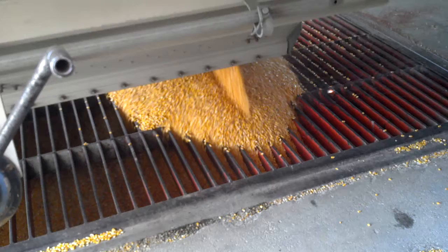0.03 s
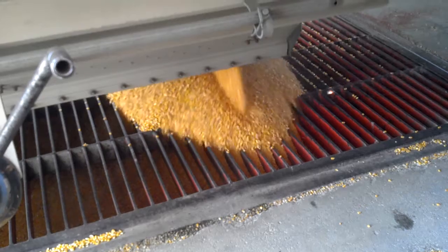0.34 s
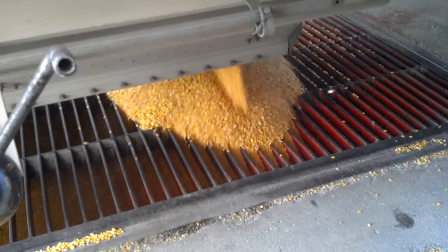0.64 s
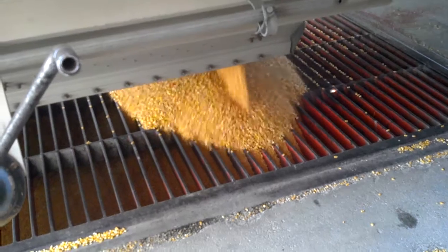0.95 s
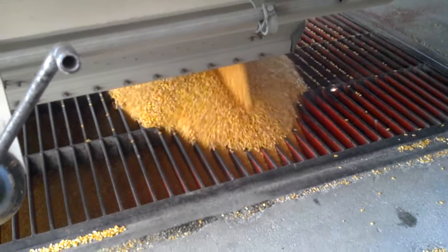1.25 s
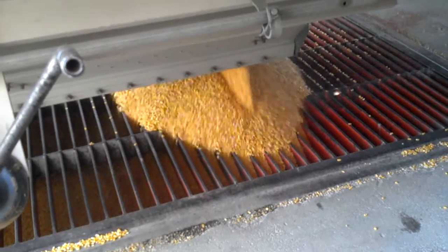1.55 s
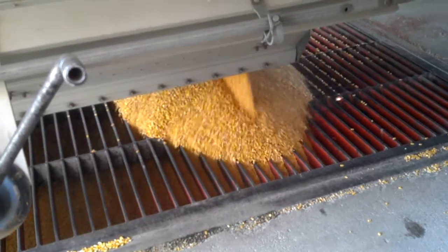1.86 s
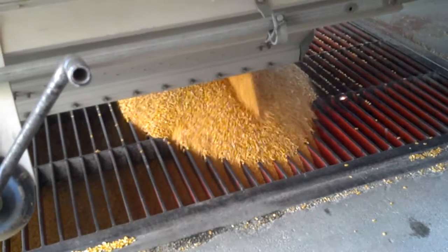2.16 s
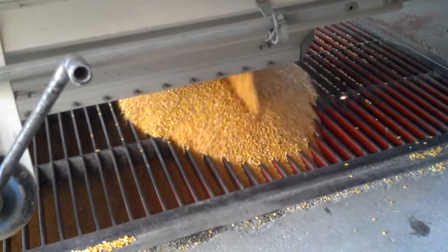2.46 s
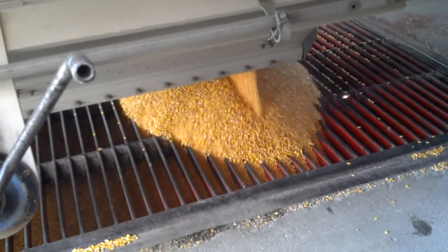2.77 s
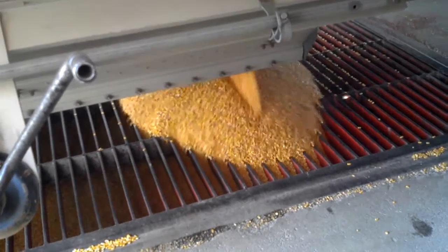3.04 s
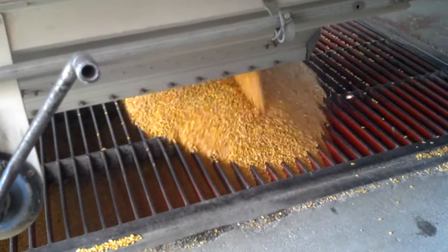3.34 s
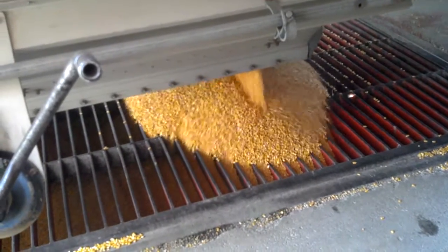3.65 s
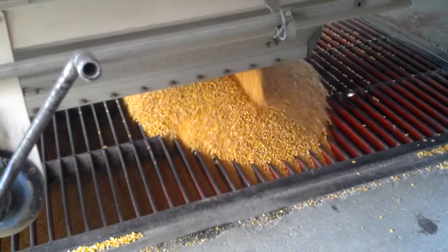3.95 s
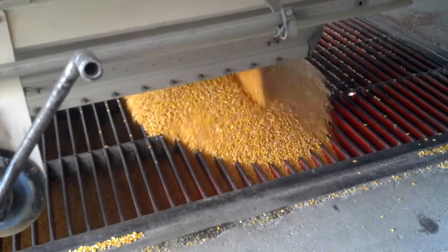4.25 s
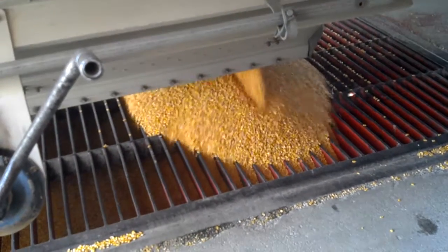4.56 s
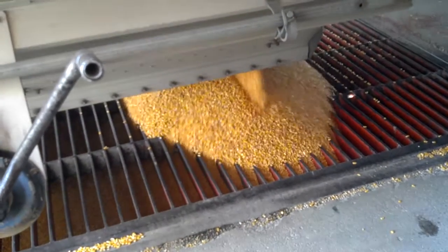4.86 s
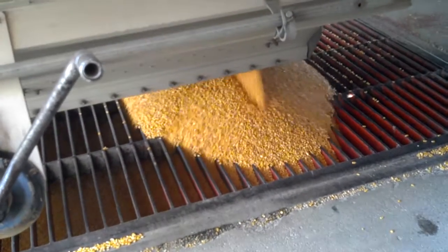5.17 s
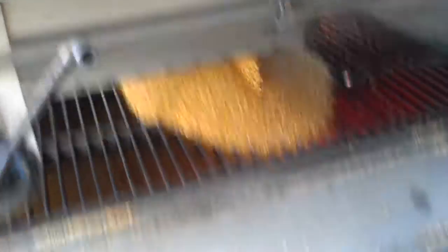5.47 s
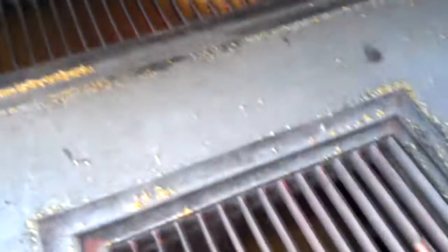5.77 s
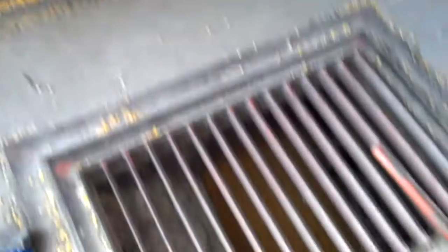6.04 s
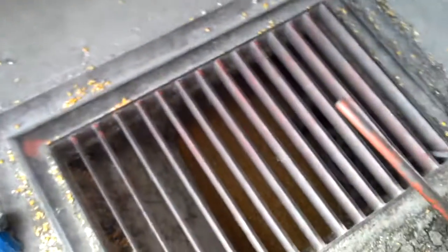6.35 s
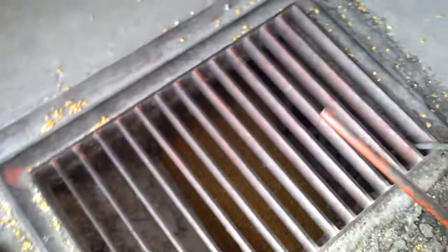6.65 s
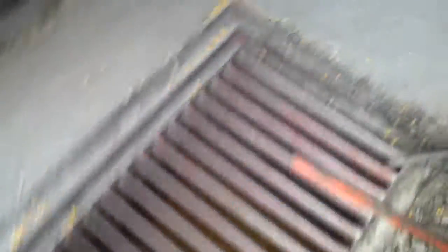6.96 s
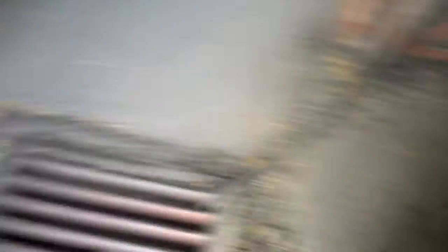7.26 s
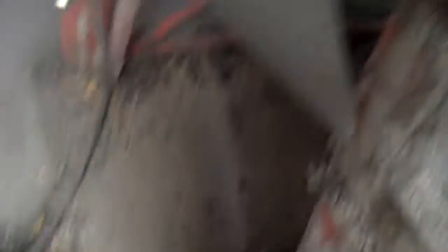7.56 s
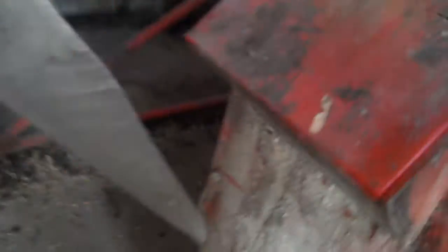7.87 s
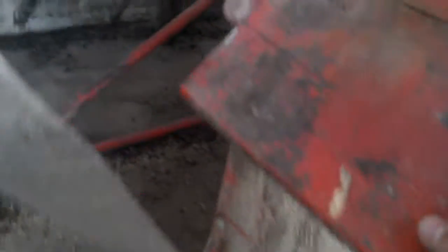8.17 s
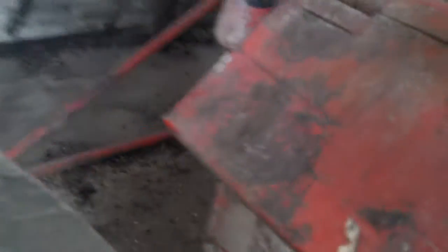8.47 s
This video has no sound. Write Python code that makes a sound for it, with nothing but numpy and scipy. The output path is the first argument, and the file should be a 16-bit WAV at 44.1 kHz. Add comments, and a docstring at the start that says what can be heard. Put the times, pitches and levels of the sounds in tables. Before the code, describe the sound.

Maize pours through a steel grate with a steady hiss over droning machinery, while sheet metal booms and wind bumps the microphone.

```python
"""Maize pouring through a grate

Maize slides from a trailer hopper through a steel floor grate: countless impacts merge into a hiss
over the roar of the pit, a conveyor's drone and an engine's hum. As the load slumps, the hopper's
sheet metal booms and clanks. Eddies of wind bump one of the camera's two microphone ports. Its gain
control ducks after loud bumps, and it widens the stereo by feeding each port to the other side."""
import sys
import numpy as np
from scipy import signal
from scipy.fft import rfft, irfft
from scipy.io import wavfile
from scipy.ndimage import uniform_filter1d

SR = 44100
rng = np.random.default_rng(int(sys.argv[2]) if len(sys.argv) > 2 else 0)


def output_pcm(signal):
    """Save a mono or channel-first signal as 16-bit PCM at the path in sys.argv[1].

    Samples are clipped to [-1, 1] before scaling.
    """
    pcm = np.clip(np.atleast_2d(signal).T, -1, 1) * 32767
    wavfile.write(sys.argv[1], SR, np.round(pcm).astype(np.int16))


N = 379701
TIME, HZ = np.arange(N) / SR, np.fft.rfftfreq(N, 1 / SR)
PORT_TRANSIT_S = .12 / 343  # port spacing over the speed of sound
START_S = .71  # silence until here

# slumps of the load: (time [s], boom level [dB], rattle level [dB], rise [s], t60 [s],
# ring level [dB], frequency round which the struck spot rings [Hz])
SLUMPS = [(1.509, -26, -49, 0.0074, .15, -31, 400), (2.615, -32, -33, .003, .3, -25, 446),
          (2.639, -21.5, -30, 0.0024, 0.72, -17.5, 700), (2.694, -21.5, -36, .004, 0.48, -20.5, 300),
          (2.868, -30, -38, .003, 0.1, -35, 270), (5.9, -26, -30.5, 0.0091, 1, -24, 170),
          (5.944, -14.5, -26.5, 0.0045, 0.6, -15.5, 266), (5.98, -30, -40, 0.0054, .4, -14, 455),
          (6.058, -19.5, -32, .008, 0.49, -16.5, 610), (6.1, -21, -33, .004, 0.27, -20.5, 740),
          (6.25, -28, -42, 0.0088, .5, -26.5, 380), (7.061, -31, -42, 0.013, 0.58, -27, 454),
          (7.184, -15, -24.5, 0.0085, 0.44, -13, 443), (7.229, -18.5, -30, .006, 0.96, -20.5, 494),
          (7.324, -21.5, -37, 0.0048, .66, -18, 307), (7.46, -26, -50, 0.0073, 0.93, -27, 360),
          (8.504, -27, -34.5, 0.0043, 0.17, -34.5, 800), (8.522, -23.5, -42, .005, 0.27, -26, 380)]
# gusts of wind: (start [s], length [s], typical eddy strength [dB])
GUST_SPANS = [(1.22, 0.68, -17), (1.85, 0.36, -14.5), (2.34, 0.19, -15), (2.74, 0.15, -14.5),
              (3.48, .29, -17), (5.15, 0.39, -23.5), (5.549, .15, -28), (7.86, 0.15, -22),
              (8.33, 0.19, -20.5)]


def amp(db):
    """Amplitude ratio of a level in decibels."""
    return 10 ** (np.asarray(db) / 20)


def unit_rms(x):
    """Normalisation to unit mean power."""
    return x / np.sqrt(np.mean(x ** 2) + 1e-20)


def colour(points):
    """Frequency response through (frequency [Hz], level [dB]) points, on a logarithmic axis."""
    hz, db = np.transpose(points)
    return amp(np.interp(np.log(HZ + 1), np.log(hz), db))


def resonances(modes):
    """Superposition of Lorentzian resonance peaks."""
    return sum(amp(db) / (1 + (2 * (HZ - hz) / width) ** 2) for hz, width, db in modes)


def modal_boost(modes):
    """A flat response that resonance alters by so many decibels at each mode."""
    return amp(sum(db / (1 + (2 * (HZ - hz) / width) ** 2) for hz, width, db in modes))


def envelopes(rows):
    """One amplitude envelope for each column of levels over time."""
    times, *columns = np.transpose(rows)
    return [amp(np.interp(TIME, times, db)) for db in columns]


def filtered(x, response):
    """Linear filtering, normalised to unit power."""
    return unit_rms(irfft(rfft(x) * response, N))


def wander(per_s):
    """Slow random modulation of unit power."""
    knots = rng.standard_normal(4000)
    return unit_rms(np.interp(TIME * per_s, np.arange(len(knots)), knots))


def diffuse(response):
    """Diffuse field: noise from all sides is coherent at the two ports only for long waves."""
    left, independent = rfft(rng.standard_normal((2, N)))
    coherence = np.sinc(2 * HZ * PORT_TRANSIT_S)
    right = coherence * left + np.sqrt(1 - coherence ** 2) * independent
    return unit_rms(irfft(np.array([left, right]) * response, N))


def grain(slide_db=0.62, spatter_db=0.5, clump_db=0.84, sway_db=0.5):
    """Friction and impact: kernels rub down the heap and spatter on the bars, in small clumps."""
    # the stream, duller as the camera turns away: (time [s], sliding level [dB], spatter level [dB])
    flow = [(.9, -37, -36), (2.4, -34.5, -35), (4.3, -34.5, -36.5), (5.7, -34, -35.5), (6.7, -33.5, -36),
            (7.6, -35, -39.5), (8.6, -36, -39)]
    # spectrum of sliding: (frequency [Hz], level [dB])
    slide_spectrum = [(90, -1), (200, 6), (700, 4.5), (1200, 1.5), (1750, 0), (2200, -6.5), (3800, -2),
                      (5000, 0), (7000, -7), (10000, -6.5), (15500, -17.5)]
    # spectrum of spatter: (frequency [Hz], level [dB])
    spatter_spectrum = [(3000, -29), (5000, -10.5), (6000, 1), (6900, 2.5), (8000, 1.5), (9200, -4.5),
                        (10500, -11), (12000, -13), (13200, -18), (14500, -30), (15600, -12)]
    # acoustic shadow at the right port, which faces away: (frequency [Hz], gain [dB])
    shadow = [(2000, -7), (3400, 1), (4700, -3.5), (6200, -3.5), (7600, -12), (9000, -3.5), (10300, -3),
              (11700, -12), (13000, -3.5), (15000, -10)]
    # modes of the grate: (frequency [Hz], bandwidth [Hz], gain [dB])
    bar_modes = [(1780, 170, 2.5), (2228, 330, 9), (2420, 26, 10.5), (3380, 50, 5.5), (3940, 27, 4.5)]
    slide_gain, spatter_gain = np.array(envelopes(flow)) * surges() * amp(sway_db * wander(per_s=15))
    ports = np.array([np.ones(len(HZ)), colour(shadow)])
    slide_response = ports * colour(slide_spectrum) * modal_boost(bar_modes)
    sliding = filtered(kernels(per_s=3500, wash_db=-1.0), slide_response)
    spattering = filtered(kernels(per_s=6000, wash_db=5.5), ports * colour(spatter_spectrum))
    stream = amp(slide_db) * slide_gain * sliding + amp(spatter_db) * spatter_gain * spattering
    return stream * amp(clump_db * wander(per_s=60))


def kernels(per_s, wash_db, spread_db=2.5):
    """Shot noise: single impacts of unequal size over the Gaussian wash of countless faint ones."""
    size = amp(spread_db * np.minimum(rng.exponential(1, (2, N)), 4))
    ticks = size * rng.choice([-1, 1], (2, N)) * (rng.random((2, N)) < per_s / SR)
    return unit_rms(ticks) + amp(wash_db) * rng.standard_normal((2, N))


def surges(attack_s=0.0044, release_s=0.032):
    """Amplitude modulation of sliding and spatter: each loose clump swells, holds and trickles out."""
    # clumps breaking loose: (time [s], hold [s], sliding boost [dB], spatter boost [dB])
    clumps = [(0.913, 0.3, 4.5, 2), (1.355, 0.043, 5.5, 5.5), (3.363, 0.059, 5, 6), (3.955, 0.04, 3, 3.5),
              (4.174, 0.21, 1.5, 2.5), (4.758, .02, 0.5, 3.5), (5.031, .02, 2, 3.5), (5.8, 0.1, 0, 1.5),
              (6.306, 0.082, 2.5, 3.5), (6.706, 0.054, 1.5, 5.5), (6.948, 0.032, 2.5, 3),
              (7.06, 0.21, 4, 3.5), (7.33, 0.026, 2, 6), (7.59, 0.064, 3, 8), (7.748, .06, 0.5, 4),
              (7.888, 0.037, 2.5, 11), (8.058, 0.017, 1, 6), (8.26, 0.068, 3, 5), (8.4, 0.028, 1.5, 4.5),
              (8.57, .04, 1.5, 3.5)]
    boost_db = np.zeros((2, N))
    for start, hold, *peaks_db in clumps:
        age = TIME - start
        swell = np.clip(age / attack_s, 0, 1) * np.exp(-np.maximum(age - hold, 0) / release_s)
        boost_db += np.outer(peaks_db, swell)
    return amp(boost_db)


def sprays():
    """Resonant filtering: skittering kernels hiss round the pitch of the steel they hit, on the left."""
    # handfuls of kernels: (time [s], level [dB], 1/e half-length [s], centre [Hz], bandwidth [Hz])
    handfuls = [(4.36, -38, 0.047, 4860, 516), (5.83, -42, 0.11, 4170, 550),
                (6.772, -30.5, 0.024, 9100, 900), (7.557, -31.5, 0.025, 6820, 698)]
    left = np.zeros(N)
    for time, db, half_length, hz, width in handfuls:
        swell = amp(db) * np.exp(-((TIME - time) / half_length) ** 2)
        left += swell * filtered(rng.standard_normal(N), resonances([(hz, width, 0)]))
    return np.array([left, np.zeros(N)])


def hopper_booms(rattle_t60_share=0.95):
    """Damped vibration: each slump excites a low boom and a brighter rattle; overlaps add in power."""
    # spectrum of the boom: (frequency [Hz], level [dB])
    boom_spectrum = [(40, -44), (130, -5.5), (240, -1), (430, -2), (650, -9.5), (900, -23), (1150, -24),
                     (2500, -35), (6000, -58)]
    # spectrum of the rattle: (frequency [Hz], level [dB])
    rattle_spectrum = [(300, -29), (580, -2), (800, 12), (1300, -4.5), (1750, -1), (2300, 0.5), (3500, -21),
                       (6000, -28)]
    boom_power, rattle_power = np.zeros((2, N))
    for start, boom_db, rattle_db, rise, t60, _, _ in SLUMPS:
        age = np.maximum(TIME - start, 0)
        onset = np.minimum(age / rise, 1)
        decay_db = 60 * np.maximum(age - rise, 0) / t60
        boom_power += (onset * amp(boom_db - decay_db)) ** 2
        rattle_power += (onset * amp(rattle_db - decay_db / rattle_t60_share)) ** 2
    boom = np.sqrt(boom_power) * diffuse(colour(boom_spectrum))
    rattle = np.sqrt(rattle_power) * diffuse(colour(rattle_spectrum))
    return boom + rattle


def panels(focus_db_per_octave=8, detune=0.0075, chatter=0.46, chatter_hz=40, ring_s=2):
    """Modal ringing: a slump excites modes near its pitch most; the load detunes and roughens them."""
    # modes of the hopper's steel panels: (frequency [Hz], level [dB], t60 [s])
    panel_modes = [(168, -11, 1.1), (267, -4, 0.62), (311, -8, 1.6), (380, -15, 1.75), (428.2, -12, 0.38),
                   (452, -4, 0.5), (475, -16, 0.49), (499, -8, 0.39), (553, -16.5, .5), (585, -20, 0.65),
                   (619, -15.5, 1.1), (663, -9, 0.32), (736, -21, 0.49), (773, -13, 0.45),
                   (836, -18.5, 0.53), (968, -14.5, .5), (1253, -15, 0.32), (1490, -18, 0.69),
                   (1673, -15.5, .4), (1868, -28, .3)]
    hz, db, t60 = np.transpose(panel_modes)
    age = np.arange(ring_s * SR) / SR
    knots = rng.standard_normal((len(hz), 200, 2)) @ [1, 1j]
    roughness = np.array([np.interp(age * chatter_hz, np.arange(len(row)), row) for row in knots])
    modes = (1 + chatter * roughness) * np.exp(np.outer(2j * np.pi * hz - np.log(1000) / t60, age))
    # each mode reaches the ports from its own direction
    lag_s = np.outer([0, 1], rng.uniform(-1, 1, len(hz))) * PORT_TRANSIT_S
    out = np.zeros((2, N))
    for start, _, _, rise, _, ring_db, ring_hz in SLUMPS:
        excitation = amp(ring_db + db - focus_db_per_octave * abs(np.log2(hz / ring_hz)))
        phasors = np.exp(2j * np.pi * (rng.random(len(hz)) + hz * lag_s))
        ring = ((excitation * phasors) @ modes).real * np.minimum(age / rise, 1)
        pitch_ratio = 1 + detune * rng.uniform(-1.02, 1)
        out += [np.interp((TIME - start) * pitch_ratio, age, port, 0, 0) for port in ring]
    return out


def knocks(relative_bandwidth=0.74):
    """Impact of steel on steel: a broad, heavily damped resonance gives an abrupt clank."""
    # hard knocks: (time [s], level [dB], t60 [s], centre frequency [Hz])
    impacts = [(1.657, -20, 0.068, 520), (2.641, -23, .05, 680), (2.661, -35, .05, 1500),
               (5.931, -23, .05, 1600), (5.95, -19, 0.09, 750), (7.192, -34, 0.035, 600),
               (7.202, -22, 0.079, 1510)]
    out = np.zeros((2, N))
    for start, db, t60, hz in impacts:
        age = TIME - start
        decay = (age > 0) * amp(db - 60 * np.maximum(age, 0) / t60)
        out += decay * diffuse(resonances([(hz, relative_bandwidth * hz, 0)]))
    return out


def wind(push_db=-4, wake_db=-14, wake_s=0.016, breeze_db=-54, breeze_swing_db=3.5, order=9):
    """Turbulent pressure: each eddy pushes and sucks at the right port, over a faint breeze."""
    # the hardest eddies: (time [s], strength [dB], centre frequency [Hz])
    puffs = [(1.416, -8, 245), (1.515, -3, 235), (1.526, -3, 380), (1.546, -7, 175), (1.577, -7, 150),
             (1.65, -4, 280), (1.661, 5.5, 273), (1.687, -2, 255), (1.712, -2.5, 185), (1.929, -1.5, 195),
             (1.953, -3, 231), (2.34, -4, 220), (2.739, -19, 164.1), (2.759, 6, 185), (3.509, -6, 210),
             (3.527, -6, 190), (5.141, -5.5, 139), (5.187, -9, 173), (5.221, -13, 210), (5.319, -11, 181),
             (5.463, -21, 157), (7.816, -9, 177)]
    # spectrum of turbulence at the port: (frequency [Hz], level [dB])
    turbulence_spectrum = [(40, -20), (70, -0.5), (125, 7), (200, -1.5), (350, -20), (700, -19.5),
                           (2000, -67)]
    turbulence = filtered(rng.standard_normal(N), colour(turbulence_spectrum))
    breeze = amp(breeze_db + breeze_swing_db * wander(per_s=22))
    pushes, wake_power = np.zeros((2, N))
    for time, db, hz in puffs + eddies():
        near = abs(TIME - time) < .1
        age = TIME[near] - time
        # a wavelet of random phase; a higher order gives it more cycles
        swirl = np.exp(2j * np.pi * rng.random()) / (1 - 2j * np.pi * hz * age / (order - .5)) ** order
        pushes[near] += amp(db) * swirl.real
        wake_power[near] += (amp(db) * np.exp(-abs(age) / wake_s)) ** 2
    turbulence_gain = amp(wake_db) * np.sqrt(wake_power) + breeze + buffeting()
    return np.array([np.zeros(N), amp(push_db) * pushes + turbulence_gain * turbulence])


def eddies(per_s=24, spread_db=1, centre_hz=140, octaves_per_db=0.6, max_per_gust=40):
    """Eddy shedding, uneven, the harder the brighter: (time [s], strength [dB], frequency [Hz])."""
    rows = []
    for start, length, db in GUST_SPANS:
        for k, (late, size) in enumerate(rng.random((max_per_gust, 2))):
            age = (k + late) / per_s
            extra_db = spread_db * (2 * size - 1)
            if age < length:
                rows.append((start + age, db + extra_db, centre_hz * 2 ** (octaves_per_db * extra_db)))
    return rows


def buffeting(level_db=-17, swing_db=4.0, edge_s=0.037):
    """Intermittency: the ragged envelope of the turbulence that fills each gust."""
    swell = np.zeros(N)
    for start, length, db in GUST_SPANS:
        outside_s = np.maximum(abs(TIME - start - length / 2) - length / 2, 0)
        swell += amp(db) * np.exp(-outside_s / edge_s)
    return swell * amp(level_db + swing_db * wander(per_s=35))


def pit(level_db=-31.0):
    """Standing waves in the concrete pit colour a diffuse roar."""
    # spectrum of the roar: (frequency [Hz], level [dB])
    roar_spectrum = [(40, -50), (75, -25), (135, -2.5), (220, -1.5), (340, -2), (450, -3.5), (620, -6),
                     (760, -9), (900, -11), (1100, -16.5), (1400, -23.5), (2200, -45), (5000, -59)]
    # modes of the pit: (frequency [Hz], bandwidth [Hz], gain [dB])
    pit_modes = [(124, 27, 3.5), (378, 27, 4.5), (436, 22, 1.5), (497, 11, 0.5), (596.5, 17, 6.5),
                 (642, 13, 4), (706, 14, -1.5), (713, 13, 4), (800, 13, 5.5), (868, 18, 2), (908, 11, 6.5),
                 (992, 12, 5)]
    return amp(level_db) * diffuse(colour(roar_spectrum) * modal_boost(pit_modes))


def conveyor():
    """Resonance: the conveyor drones in three narrow bands of noise and a faint broad one."""
    # peaks of the drone: (frequency [Hz], bandwidth [Hz], level [dB])
    drone_peaks = [(315, 12, 1.5), (376, 14, -6), (617.6, 6.3, -1.5), (1500, 840, -26)]
    # the drone grows as the camera turns to it: (time [s], level [dB])
    drone_levels = [(.9, -44), (4.2, -47), (6, -46.5), (7.6, -39), (8.6, -38)]
    return envelopes(drone_levels)[0] * diffuse(resonances(drone_peaks))


def engine(firing_hz=72.6, hum_db=-44, waver=0.0041, throb_db=7.0):
    """Periodic firing makes a throbbing harmonic series that drives the two ports in antiphase."""
    # harmonics: (multiple of the firing rate, level [dB])
    harmonics = [(1, 1), (2, -10), (3, -30)]
    cycles = np.cumsum(firing_hz * (1 + waver * wander(per_s=8))) / SR
    firing = sum(amp(db) * np.sin(2 * np.pi * k * cycles) for k, db in harmonics)
    hum = unit_rms(firing) * amp(hum_db + throb_db * wander(per_s=8))
    return np.array([hum, -hum]) / 2


def gain_control(x, threshold_db=-15.5, range_db=7.5, recover_db_per_s=3, start_duck_db=5):
    """Compression: the gain starts low, drops at once on loud bumps or booms, and creeps back up."""
    bass_cut = signal.butter(2, 140, "high", fs=SR, output="sos")  # deep bass hardly moves the gain
    sensed = signal.sosfilt(bass_cut, x)
    power = uniform_filter1d(sensed ** 2, round(.019 * SR)).max(0)  # the louder port rules
    duck_db = np.clip(10 * np.log10(abs(power) + 1e-12) - threshold_db, 0, range_db)
    duck_db = np.where(TIME < START_S, start_duck_db, duck_db)
    recovered_db = recover_db_per_s * TIME
    return x * amp(recovered_db - np.maximum.accumulate(duck_db + recovered_db))


def widen(x, delay_samples=16, lean=0.11):
    """Interference widens the stereo: each port is fed, late and inverted, to the other side."""
    # cross-feed, weaker in the bass: (frequency [Hz], gain before the cap at unity [dB])
    cross_feed = [(120, -2.5), (700, -4), (1350, -4.5), (2400, 7)]
    late = np.pad(x, ((0, 0), (delay_samples, 0)))[:, :N]
    wide = x - irfft(rfft(late[::-1]) * np.minimum(colour(cross_feed), 1), N)
    return wide + lean * wide.mean(0) * np.array([[-1], [1]])  # the centre leans to the right


def scene():
    """Superposition of all sources at the two ports."""
    pour = grain() + sprays()
    machinery = engine() + pit() + conveyor()
    return pour + machinery + hopper_booms() + panels() + knocks() + wind()


def record(dry, low_cut_hz=48, fade_s=0.2, ceiling=.8, high_cut_hz=15750):
    """The camera's signal chain: gain control, widening, fade-in, soft saturation and band limits."""
    wide = widen(gain_control(dry))
    wide = signal.sosfilt(signal.butter(4, low_cut_hz, "high", fs=SR, output="sos"), wide)
    fade_in = np.clip((TIME - START_S) / fade_s, 0, 1)
    saturated = ceiling * np.tanh(wide * fade_in / ceiling)
    low_pass = signal.firwin(511, high_cut_hz, window=("kaiser", 9), fs=SR)
    return signal.oaconvolve(saturated, low_pass[None], "same")


dry = scene()
out = record(dry)
output_pcm(out)
```